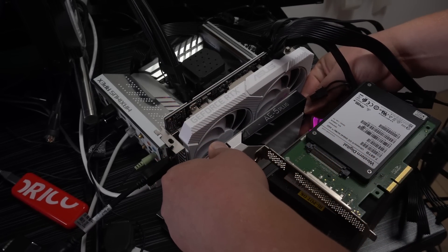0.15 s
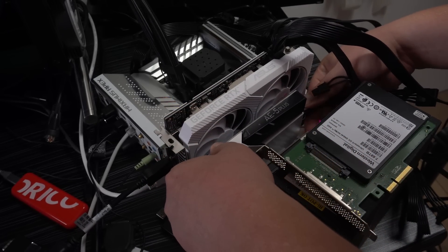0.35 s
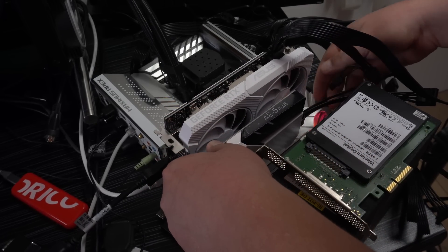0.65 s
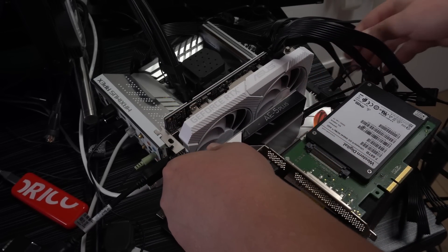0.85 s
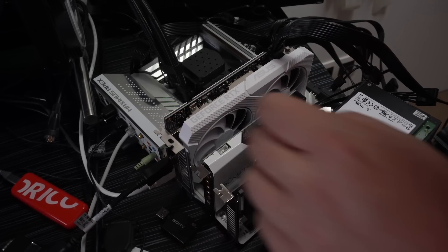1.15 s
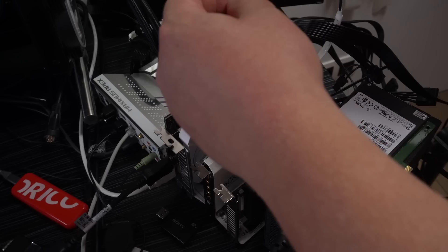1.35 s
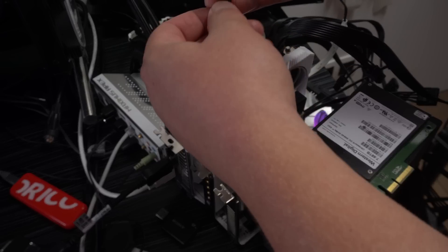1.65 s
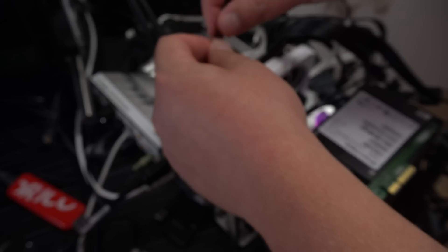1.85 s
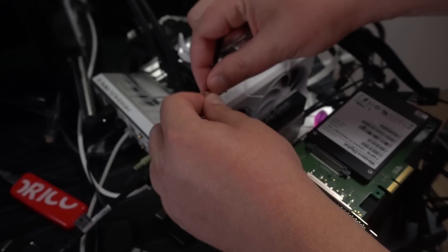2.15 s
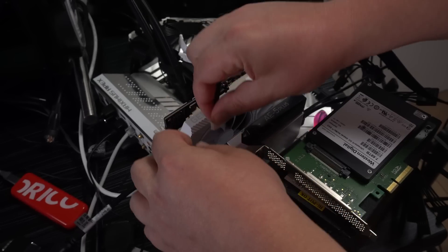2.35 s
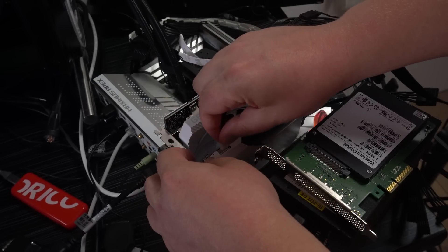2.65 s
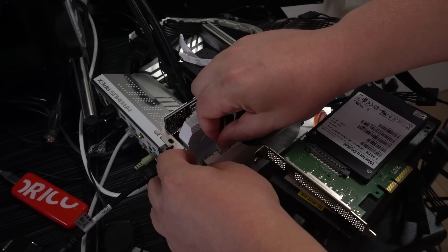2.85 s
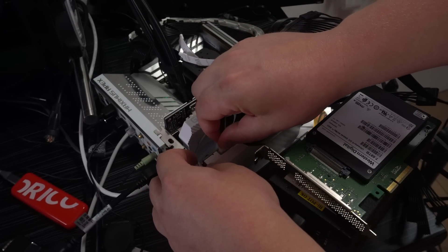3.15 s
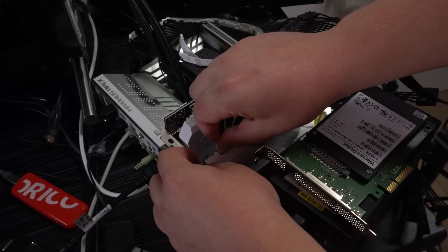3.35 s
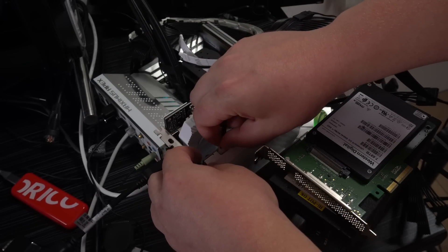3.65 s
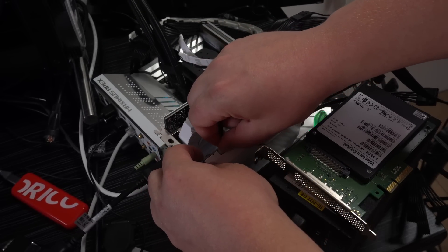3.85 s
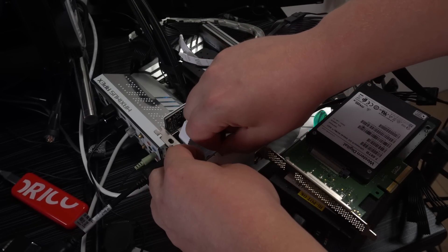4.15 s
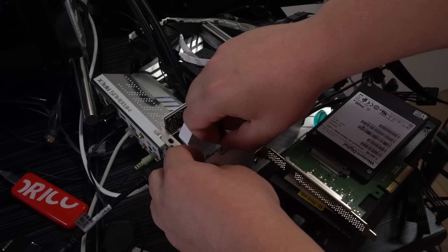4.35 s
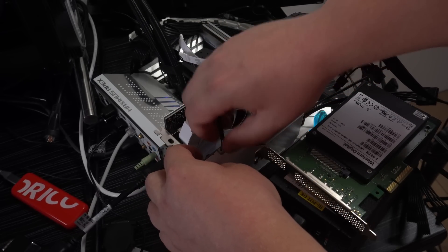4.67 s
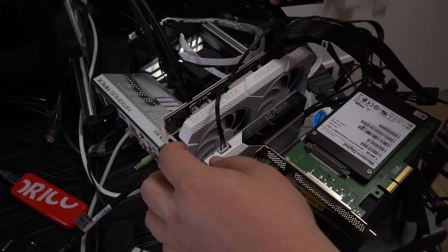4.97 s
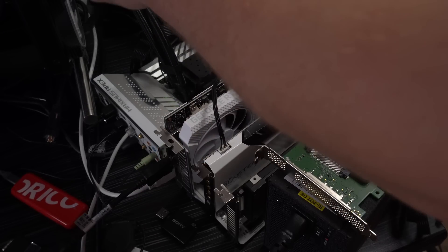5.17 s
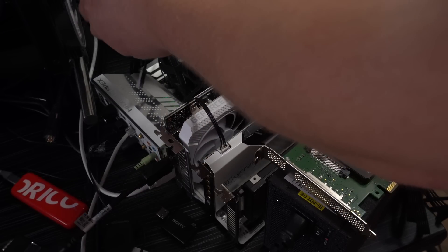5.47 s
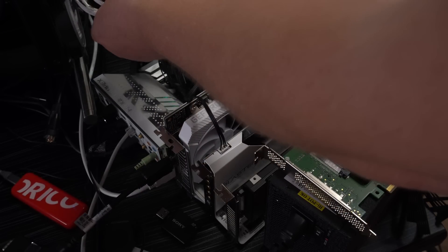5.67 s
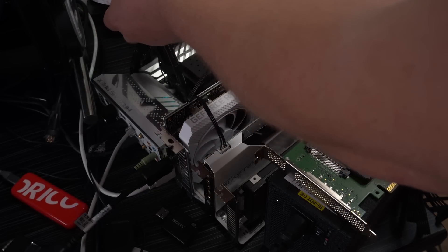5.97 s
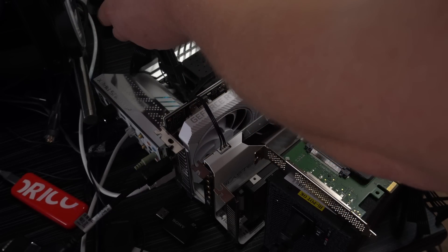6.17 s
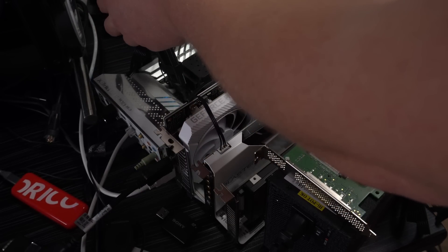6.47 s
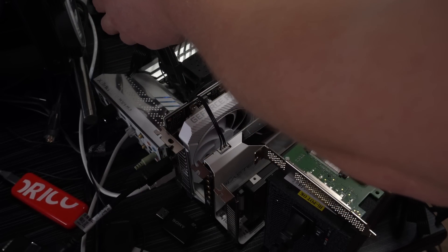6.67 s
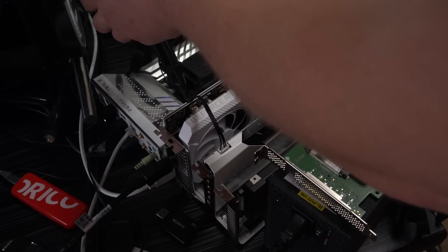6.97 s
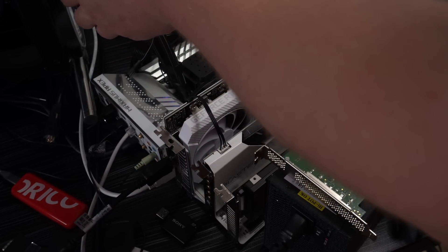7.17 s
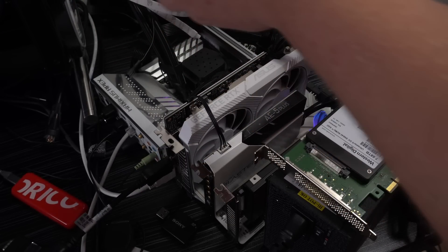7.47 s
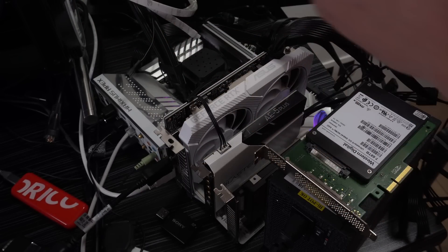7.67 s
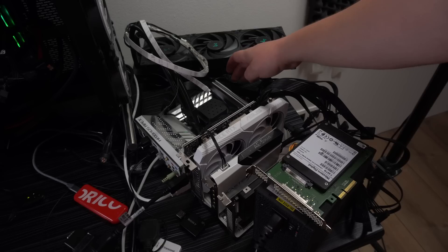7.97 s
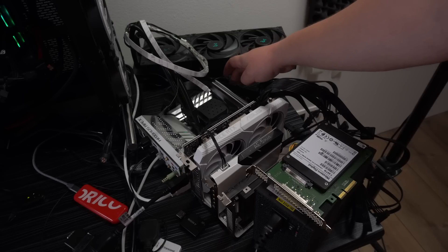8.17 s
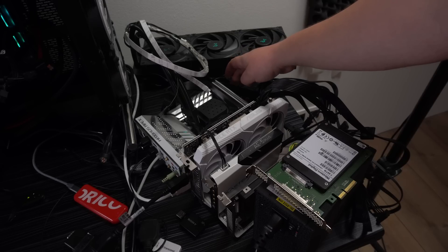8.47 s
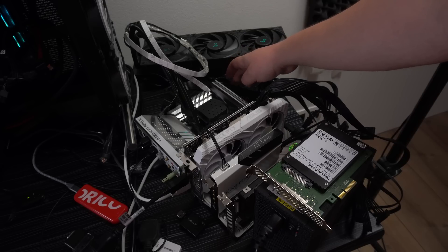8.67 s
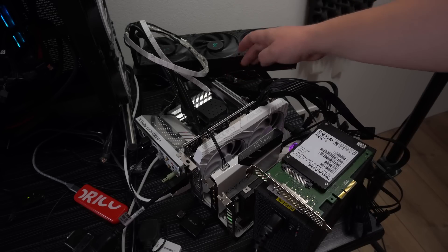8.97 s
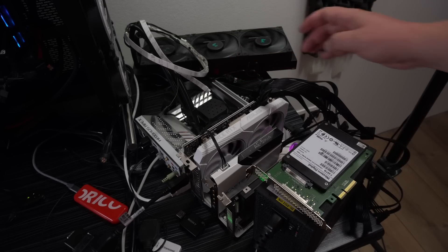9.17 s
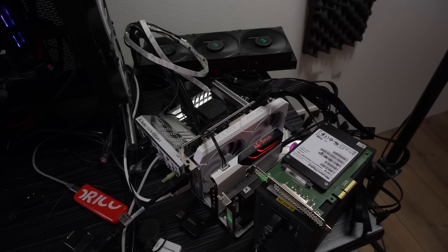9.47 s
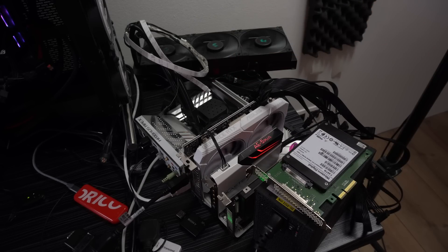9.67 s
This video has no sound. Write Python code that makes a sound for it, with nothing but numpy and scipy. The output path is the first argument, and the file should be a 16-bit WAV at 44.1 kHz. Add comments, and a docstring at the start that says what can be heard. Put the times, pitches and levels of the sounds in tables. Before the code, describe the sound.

Close stereo microphones in a small room catch sparse card clicks and low bench knocks over quiet fan air. A firmer clack lands at four seconds, then a plug scrapes, squeaks, clatters and rattles before a bright metallic latch snap. After a quiet pause, cloth swishes, a switch clicks over and a soft fan drone continues.

```python
"""Hands work on an open computer test bench in a small room, heard by two close-set capsules: a card is
rocked and pressed into its slot, a cable plug scrapes, rattles and latches, and a switch clicks at the back.
Contacts are coloured noise bursts with ringing metal; rubbing is uneven noise. Every push knocks the board,
then booms and shudders through the bench as decaying modes and rumble. Fans run quietly as shaped noise
with faint narrow whines, and a shirt's cloth swishes as the arm draws back."""
import sys
import numpy as np
from scipy import signal
from scipy.fft import rfft, irfft, next_fast_len
from scipy.io import wavfile
from scipy.ndimage import map_coordinates

SR = 44100
rng = np.random.default_rng(int(sys.argv[2]) if len(sys.argv) > 2 else 0)


def master_out(mix):
    """Clip the mix to full scale and print it as 16-bit PCM to the path in sys.argv[1]."""
    frames = np.transpose(np.atleast_2d(mix))
    ceiling = np.clip(frames, -1, 1)
    pcm = np.round(ceiling * 32767).astype(np.int16)
    wavfile.write(sys.argv[1], SR, pcm)


N = 433044  # length in samples

# Levels in the tables are before the room tail and before any gain_db of the source.
# Fan and room air, its colour: (f/Hz, density/dB per Hz)
AIR_COLOUR = [(12, -28), (20, 1), (60, -7.5), (86, -2.5), (222, -8.5), (248, -7), (328, -8.5), (357, -7.5),
              (558, -14), (642, -14), (1030, -19.5), (1290, -22), (2750, -26.5), (10200, -30),
              (16000, -32.5)]
# Likeness of the air at the left and right capsules: (f/Hz, correlation)
AIR_LIKENESS = [(50, 0.87), (150, 1), (400, 0.11), (1000, 0.04), (3000, 0.0823), (15000, 0.17)]
# Deep rumble of the stand: (t/s, level/dB)
RUMBLE_LEVEL = [(0, -60), (.8, -64.5), (1.6, -60.5), (2.6, -69), (3.9, -62.5), (5.2, -62.5), (6.0, -68.5),
                (8.4, -66.5), (9.8, -64)]
AIR_GAIN_DB = -61.5  # steady fan air between the deep rumble and the hiss
# Rumble left by the hardest push, its decay, and its change in dB per dB of boom
SHUDDER_DB, SHUDDER_T60_S, SHUDDER_GROWS = -50, 1.1, 0.45
# The same for the shaking stand, which moves far less after lighter pushes
SHAKE_DB, SHAKE_T60_S, SHAKE_GROWS = -53.5, 1, 3.4
# Spells of electrical whine: (t/s, length/s, level/dB, f/Hz, width/Hz)
WHINE_SPELLS = [(.15, 2.4, -84, 8270, 25), (.3, 0.38, -74, 8430, 25), (1.9, 0.43, -83, 10160, 70),
                (2.55, 4.4, -79.5, 9950, 70), (4.6, 0.75, -75.5, 8290, 25)]
# A fan's steady drone: (t/s, length/s, level/dB)
DRONE_SPELLS = [(7.94, 1.9, -68)]

# The card slides in its slot: (t/s, length/s, level/dB)
CARD_STROKES = [(.184, .088, -56), (4.3, 0.018, -53)]
# Colour of the sliding card: (f/Hz, density/dB per Hz)
CARD_RUB_COLOUR = [(410, -32), (700, -3), (852, -6), (1230, -20), (1500, 0), (1800, -10), (2300, -10),
                   (3110, -9), (3600, -16), (4900, -9), (7590, -20.5), (14200, -14.5), (16000, -35.5)]
# The card's edge and bracket catch: (t/s, level/dB, treble/dB, f/Hz, emphasis at f/dB)
CARD_CONTACTS = [(.2315, -41.5, -11, 1870, 3), (.3188, -48.5, -11, 1910, -3), (.5367, -52, -22, 1320, 3.5),
                 (1.4915, -52, 2.5, 2440, 3), (1.8734, -64, 2.5, 1620, -3), (2.538, -70.5, 5, 2360, 23),
                 (3.0662, -56.5, -7, 1660, -1), (3.3205, -59.5, -1, 10500, 14), (3.3505, -42, -7, 1550, 13),
                 (3.385, -55, -14, 2600, -14), (3.4236, -53, -10, 2110, 0), (4.0118, -31, -5, 1670, -3.5),
                 (4.3995, -48.5, -32, 1030, 10), (4.5043, -57.5, -6, 2720, 2)]
# Colour of the card's contacts: (f/Hz, density/dB per Hz)
CARD_COLOUR = [(530, -23), (900, -5), (1030, -13), (1530, 1), (2140, -8.5), (2660, -5), (3430, -11.5),
               (6890, -25), (7860, -30.5), (12000, -28.5), (16000, -43.5)]
# Ringing of the metal frame: (f/Hz, level/dB, t60/s)
FRAME_MODES = [(1435, -7.5, .2), (1660, -5.5, 0.12), (1890, -3, 0.14), (2290, -8, .25), (4945, -8.5, .28),
               (5167, -4.5, .28)]
# Pushes that reach the bench: (t/s, knock level/dB, boom level/dB, boom f/Hz)
BENCH_PUSHES = [(0.231, -45, -42, 300), (0.325, -38.5, -37.5, 310), (.535, -36.5, -33, 275),
                (0.856, -49, -46, 290), (1.075, -66, -56, 285), (1.491, -45.5, -76, 298),
                (3.075, -46.5, -43.5, 315), (3.168, -45, -38, 310), (3.353, -40, -40.5, 295),
                (3.425, -45.5, -45, 293), (4.013, -29, -28, 320), (4.13, -48, -38.5, 310),
                (4.419, -52.5, -45.5, 280), (4.5, -59, -54, 199), (5.048, -70, -49.5, 340),
                (5.397, -41, -43, 240), (5.537, -50, -46, 286), (5.656, -66, -39, 480),
                (5.725, -77, -32, 456), (6.14, -63, -49, 407), (8.519, -60, -46.5, 150),
                (8.693, -47, -42, 148)]
# Ringing of the bench: (f/Hz, level/dB, t60/s)
BENCH_MODES = [(63.6, -10.5, 0.337), (112.1, -11, 0.53), (145, -16.5, 0.24), (234, -7.5, 0.18),
               (294.5, 3, 0.19), (319.5, -10, 0.2), (383.3, -3.5, 0.16), (431, 0.5, 0.11),
               (521, -6.5, 0.18), (620.4, -13.5, 0.121), (723, -9.5, 0.1), (776, -14.5, 0.08),
               (847, -5.5, 0.16)]
KNOCK_HZ, BOOM_LAG_S = 803, 0.013  # the board knocks at once, the heavier bench follows
# Hands lean and shift on the bench: (t/s, length/s, level/dB)
HAND_LEANS = [(.95, 0.22, -65.5), (1.8, 0.63, -66.5), (3.52, 0.12, -64.5), (5.1, 0.57, -57),
              (5.9, 0.51, -57)]
# Soft swishes of the shirt's cloth: (t/s, length/s, level/dB)
CLOTH_STROKES = [(1.19, .14, -65.5), (7.77, 0.13, -55.5)]
# Colour of the cloth: (f/Hz, density/dB per Hz)
CLOTH_COLOUR = [(500, -9), (1300, -5), (2800, 0.5), (6000, -3), (11000, -7.5), (16000, -14.5)]

# The plug slides in its socket: (t/s, length/s, level/dB)
PLUG_STROKES = [(5.045, 0.18, -71), (5.27, 0.047, -57), (5.33, 0.044, -41.5), (5.4, .41, -59.5)]
# Colour of the sliding plug: (f/Hz, density/dB per Hz)
PLUG_RUB_COLOUR = [(530, -47.5), (900, -11), (1260, -21.5), (1720, -9.5), (2140, -17), (2690, -8.5),
                   (3430, -16.5), (5480, -13), (6030, -14), (6560, -9.5), (7400, -19), (9880, -20.5),
                   (16000, -29)]
# Resonances lifted by its friction: (f/Hz, width/Hz, lift/dB)
PLUG_RUB_MODES = [(1654, 110, 3.5), (2140, 40, 3.5), (5540, 64, 3.5), (6270, 110, 2)]
# The plug's metal shell whistles: (t/s, length/s, level/dB)
SHELL_WHISTLES = [(5.18, .055, -67), (5.335, .035, -56)]
# Friction sings as the plug nears its seat: (t/s, length/s, level/dB)
PLUG_SQUEAK = [(5.343, .02, -37)]
SQUEAK_HZ, SAG_HZ_PER_S = 1770, 1300  # the pitch falls as the plug slows
# The plug knocks in its socket: (t/s, level/dB, treble/dB, f/Hz, emphasis at f/dB)
PLUG_CONTACTS = [(5.2635, -37, -15.5, 1689, 3), (5.373, -22.5, -9, 1900, -6), (5.3960, -15.5, 4, 5650, 3.5),
                 (5.5447, -27.5, -2.5, 1650, 6), (5.6305, -28, -6.5, 1640, 6.5),
                 (5.6812, -45, 10, 7000, 3.5), (5.7312, -30, -2, 2230, 9), (5.7425, -24.5, 1.5, 5300, 5.5),
                 (5.8085, -25.5, -23, 2200, 13.5), (5.963, -46, 1.5, 1170, 35),
                 (6.0655, -46, 9, 10770, 12.5)]
# Colour of the plug's contacts: (f/Hz, density/dB per Hz)
PLUG_COLOUR = [(530, -26), (900, -11), (1070, -25), (1190, -10), (1700, -10), (1850, -8.5), (2190, -7.5),
               (2500, -7.5), (4360, -10.5), (5100, -6), (7060, -10.5), (9200, -7.5), (11800, -7),
               (12700, -18.5), (16000, -14.5)]
# The plug's pins tick as it is wiggled: (t/s, length/s, level/dB)
PIN_RATTLES = [(5.48, 0.34, -47), (5.92, 0.33, -56.5)]
TICKS_PER_S, TICK_T60_S = 83, .006  # mean rate
# The plug judders in as it is pushed home: (t/s, length/s, level/dB)
PLUG_JUDDERS = [(5.665, 0.021, -44.5), (5.7, 0.134, -51.5)]
# The latch rides up and snaps home: (t/s, level/dB, treble/dB, f/Hz, emphasis at f/dB)
LATCH_CONTACTS = [(6.1464, -30.5, -2.5, 1163, 30.5), (6.2468, -17.5, -3, 1610, 3.5)]
# Colour of the latch: (f/Hz, density/dB per Hz)
LATCH_COLOUR = [(530, -58), (900, -19.5), (1200, -14.5), (1560, -1.5), (1800, -11), (2200, 5), (2550, -12),
                (3050, 2.5), (3500, -3), (5040, -7.5), (6400, -16.5), (7300, -7), (11500, -19),
                (16000, -30)]
# Ringing of the latch spring: (f/Hz, level/dB, t60/s)
SPRING_MODES = [(1643, -7, 0.11), (2140, 4, 0.42), (2210, 1.5, 0.37), (2290, -11, 0.34), (4940, 3, 0.25)]
# The switch goes down, over and back: (t/s, level/dB, treble/dB, f/Hz, emphasis at f/dB)
SWITCH_CONTACTS = [(8.5215, -27, -6.5, 2280, -2.5), (8.6445, -23, -8.5, 4070, 11),
                   (8.693, -35, -24.5, 1200, 22)]
# Colour of the switch: (f/Hz, density/dB per Hz)
SWITCH_COLOUR = [(530, -49), (900, -18), (1020, -27), (1500, -19), (1950, -16), (2550, -17.5), (3000, -21),
                 (3600, -17.5), (4100, -14.5), (5000, -14.5), (6800, -17.5), (12300, -19.5), (16000, -30)]
# Ringing of the switch's housing: (f/Hz, level/dB, t60/s)
HOUSING_MODES = [(1490, -9, .12), (2530, -10, .13), (3900, 5, 0.15), (4200, 0, .14)]

# Decay of the room: (f/Hz, t60/s)
ROOM_T60 = [(100, 1), (400, 0.56), (2000, 0.58), (5000, 0.51), (10000, 0.42), (16000, 0.41)]
# Colour of the room tail: (f/Hz, level/dB)
ROOM_TINT = [(100, -5.5), (400, 2), (2000, 0), (5000, -2), (10000, -4), (16000, -5.5)]
# Side part of the room tail: (f/Hz, level/dB)
ROOM_WIDTH = [(100, -16.5), (300, -16.5), (1000, -4), (3000, -5), (12000, -2)]
TOP_HZ = 16000  # the microphone's band limit


def amp(db):
    """Decibels to gain."""
    return 10 ** (np.asarray(db) / 20)


def unit(x):
    """Scale to rms 1."""
    return x / np.sqrt(np.mean(x ** 2) + 1e-20)


def unit_attack(x, span):
    """Scale to rms 1 over the first span seconds."""
    return x / np.sqrt(np.mean(x[..., :int(span * SR)] ** 2) + 1e-20)


def along(points, hz):
    """Read (Hz, value) points on a log-frequency axis."""
    f, v = np.transpose(points)
    return np.interp(np.log(hz + 1), np.log(f + 1), v)


def bump(hz, centre_hz, octaves):
    """A bell curve on the log-frequency axis."""
    return np.exp(-(np.log2((hz + 1) / centre_hz) / octaves) ** 2)


def body(spectrum, modes):
    """Gain of a broad colour with a few resonances standing out of it."""
    def gain(f):
        lift = sum(db / (1 + ((f - hz) / width) ** 2) for hz, width, db in modes)
        return amp(along(spectrum, f) + lift)
    return gain


def filtered(x, response):
    """Multiply the spectrum of x by a response of frequency."""
    n = x.shape[-1]
    m = next_fast_len(n + SR // 8)
    return irfft(rfft(x, m) * response(np.fft.rfftfreq(m, 1 / SR)), m)[..., :n]


def wobble(rate):
    """A smooth random curve, rate knots a second."""
    knots = rng.standard_normal(int(N * rate / SR) + 4)
    return map_coordinates(knots, [np.arange(N) * rate / SR])


def strokes(rows, attack, release):
    """Gain of strokes: each swells by 20 dB over attack up to t, holds, and fades by 20 dB per release."""
    t = np.arange(N) / SR
    gain = 0
    for s, length, db in rows:
        before = np.maximum(s - t, 0) / attack
        after = np.maximum(t - s - length, 0) / release
        gain = gain + amp(db - 20 * before - 20 * after)
    return gain


def pair(size, side_db):
    """Stereo noise with its side part at side_db against the mid."""
    mid, side = rng.standard_normal((2, size))
    return unit(np.array([mid + amp(side_db) * side, mid - amp(side_db) * side]))


def tone(hz, width_hz):
    """A fuzzy line: narrow-band noise of rms 1."""
    return unit(filtered(pair(N, side_db=-2), lambda f: 1 / (1 + ((f - hz) / width_hz) ** 2)))


def ring(modes, t, scatter_db):
    """Sum decaying sine modes, with strengths scattered afresh by scatter_db."""
    out = 0
    for hz, db, t60 in modes:
        decay = amp(db + scatter_db * rng.normal() - 60 * t / t60)
        out = out + decay * np.sin(2 * np.pi * (hz * t + rng.random()))
    return out


def in_room(x, wet_db):
    """Add a fresh diffuse tail of decaying noise, with a decay time for each frequency."""
    hz, t, z = signal.stft(rng.standard_normal((2, SR // 2)), SR, nperseg=256)
    fade = amp(-60 * t / along(ROOM_T60, hz)[:, None]) * (1 - np.exp(-t / 0.0008))
    tail = signal.istft(z * fade, SR, nperseg=256)[1]
    tail = filtered(tail / np.linalg.norm(tail[0]), lambda f: amp(along(ROOM_TINT, f)))
    # the two capsules are close, so they share the long waves of the room
    mid, side = tail
    side = filtered(side, lambda f: amp(along(ROOM_WIDTH, f)))
    tail = np.array([mid + side, mid - side])
    return x + amp(wet_db) * signal.fftconvolve(x, tail, axes=1)[:, :x.shape[1]]


def add(track, s, sound):
    """Mix a sound into the track at s seconds."""
    start = round(s * SR)
    track[:, start:start + sound.shape[1]] += sound[:, :N - start]


def aftermath(t60, grows):
    """Gain of the vibration the pushes leave, scaled to the hardest; their energies add and die away."""
    t = np.arange(N) / SR
    hardest = max(db for _, _, db, _ in BENCH_PUSHES)
    energy = 0
    for s, _, db, _ in BENCH_PUSHES:
        energy = energy + (t > s) * amp(grows * (db - hardest) - 60 * np.abs(t - s) / t60) ** 2
    return np.sqrt(energy)


def sliding(gain, colour, grain_db, wet_db):
    """Uneven stick and slip rasps: noise in the colour of the rubbing parts, its level wobbling fast."""
    rasp = filtered(pair(N, side_db=-8.0), colour) * amp(grain_db * wobble(450))
    return in_room(gain * unit(rasp), wet_db)


def clicks(table, colour, modes, rise, t60, treble_t60, gain_db, treble_db, ring_db, pan_db, wet_db):
    """Each contact is a brief chatter in its part's colour, and sets nearby parts ringing faintly."""
    out, t = np.zeros((2, N)), np.arange(SR // 2) / SR
    swell = 1 - np.exp(-(t / rise) ** 2)
    pan = amp([[pan_db / 2], [-pan_db / 2]])  # positive leans left

    def envelope(decay):
        return swell * amp(-60 * t / max(decay, .004))

    for s, db, bright_db, pitch_hz, pitch_db in table:
        # the place of contact favours one region of the spectrum
        def contact(f):
            return amp(along(colour, f) + pitch_db * bump(f, pitch_hz, octaves=0.63))
        chatter = filtered(pair(len(t), side_db=-7.5), contact)
        low = filtered(chatter, lambda f: 1 / (1 + (f / 5000) ** 8))
        clack = unit_attack(low * envelope(t60), 0.007)
        # the treble dies first
        snap = unit_attack((chatter - low) * envelope(treble_t60), 0.0064)
        ringing = swell * ring(modes, t, scatter_db=5)
        hit = clack + amp(bright_db + treble_db) * snap + amp(ring_db) * ringing
        add(out, s - .001, in_room(amp(db + gain_db) * hit * pan, wet_db))
    return out


def fans(hiss_db):
    """Shaped noise as rumble, fan air and hiss; the low bands swell as the bench shudders from a push."""
    # the mix of mid and side sets how alike the two capsules hear each frequency
    def spread(f):
        turn = np.arccos(np.clip(along(AIR_LIKENESS, f), -1, 1)) / 2
        return amp(along(AIR_COLOUR, f)) * [np.cos(turn), np.sin(turn)]

    mid, side = filtered(rng.standard_normal((2, N)), spread)
    air = unit(np.array([mid + side, mid - side]))
    low = filtered(air, lambda f: 1 / (1 + (f / 800) ** 4))
    deep = filtered(air, lambda f: 1 / (1 + (f / 100) ** 6))
    stand = unit(filtered(deep, lambda f: amp(14 * bump(f, 52, octaves=0.59))))
    rumble_db = np.interp(np.arange(N) / SR, *np.transpose(RUMBLE_LEVEL))
    stand_gain = np.hypot(amp(rumble_db), amp(SHAKE_DB) * aftermath(SHAKE_T60_S, SHAKE_GROWS))
    low_gain = np.hypot(amp(AIR_GAIN_DB), amp(SHUDDER_DB) * aftermath(SHUDDER_T60_S, SHUDDER_GROWS))
    return stand_gain * stand + low_gain * (low - deep) + amp(hiss_db) * (air - low)


def whine():
    """Thin electrical whines come and go as narrow noise; a fan drones with a weaker higher partial."""
    whines = 0
    for s, length, db, hz, width_hz in WHINE_SPELLS:
        whines = whines + strokes([(s, length, db)], attack=0.23, release=.2) * tone(hz, width_hz)
    drone = tone(hz=657, width_hz=48) + amp(-16.5) * tone(hz=1223, width_hz=9.7)
    return whines + strokes(DRONE_SPELLS, attack=0.044, release=.2) * drone


def card_rub():
    """The card rasps along its slot in short strokes."""
    gain = strokes(CARD_STROKES, attack=.02, release=.04)
    return sliding(gain, lambda f: amp(along(CARD_RUB_COLOUR, f)), grain_db=0.5, wet_db=-4)


def card():
    """The card's edge and bracket catch, and the metal frame rings faintly."""
    return clicks(CARD_CONTACTS, CARD_COLOUR, FRAME_MODES, rise=0.00328, t60=0.044, treble_t60=0.032,
                  gain_db=-5, treble_db=2.5, ring_db=-35, pan_db=-1.0, wet_db=-1.0)


def thud(centre_hz, puff_db, focus_db, peak_db, t60):
    """A dull burst that ends steeply above 1 kHz, and the bench's modes near the contact's own pitch."""
    t = np.arange(SR // 2) / SR
    modes = [(hz, level + focus_db * bump(hz, centre_hz, octaves=0.45), decay)
             for hz, level, decay in BENCH_MODES]
    boom = unit_attack(ring(modes, t, scatter_db=0.0) * (1 - np.exp(-t / 0.009)), 0.04)

    def dullness(f):
        peak = amp(peak_db * bump(f, centre_hz, octaves=0.21))
        return peak / (1 + (f / (1.4 * centre_hz)) ** 3) / (1 + (f / 980) ** 12)

    dull = filtered(pair(len(t), side_db=-21.5), dullness)
    puff = unit_attack(dull * amp(-60 * t / t60) * (1 - np.exp(-t / 0.00059)), 0.0093)
    return boom + amp(puff_db) * puff


def bench(gain_db, wet_db):
    """Each push knocks the board and, a moment later, booms in the bench."""
    out = np.zeros((2, N))
    for s, knock_db, boom_db, boom_hz in BENCH_PUSHES:
        knock = thud(KNOCK_HZ, puff_db=2.5, focus_db=6.5, peak_db=13.5, t60=0.19)
        boom = thud(boom_hz, puff_db=2, focus_db=17, peak_db=16, t60=0.28)
        add(out, s, in_room(amp(knock_db + gain_db) * knock, wet_db))
        add(out, s + BOOM_LAG_S, in_room(amp(boom_db + gain_db) * boom, wet_db))
    return out


def hands():
    """Hands lean and shift: soft low noise centred near 305 Hz."""
    def colour(f):
        return amp(12 * bump(f, 305, octaves=0.45)) / (1 + (f / 700) ** 4)
    gain = strokes(HAND_LEANS, attack=0.146, release=0.074)
    return sliding(gain, colour, grain_db=0.5, wet_db=-11.5)


def cloth_swish():
    """A shirt's cloth brushes as the arm draws back: soft noise, swelling slowly, with a quick fade."""
    brush = pair(N, side_db=0) * amp(0.95 * wobble(54))
    cloth = unit(filtered(brush, lambda f: amp(along(CLOTH_COLOUR, f))))
    lean_right = amp([[-1.5], [1.5]])
    return strokes(CLOTH_STROKES, attack=.22, release=.015) * cloth * lean_right


def plug_rub():
    """The plug scrapes in its socket, friction lifting a few resonances."""
    gain = strokes(PLUG_STROKES, attack=0.0045, release=.03)
    return sliding(gain, body(PLUG_RUB_COLOUR, PLUG_RUB_MODES), grain_db=-2.4, wet_db=0)


def squeak(jitter, rough_db, wet_db):
    """Thin two-line whistles of the metal shell, and a short, rough, falling squeal of friction."""
    since = np.clip(np.arange(N) / SR - PLUG_SQUEAK[0][0], -.05, .05)
    hz = (SQUEAK_HZ - SAG_HZ_PER_S * since) * (1 + jitter * wobble(400))
    squeal = unit(amp(rough_db * wobble(260)) * np.sin(2 * np.pi * np.cumsum(hz) / SR))
    whistle = unit(tone(hz=4840, width_hz=29) + tone(hz=6370, width_hz=55))
    squeals = strokes(PLUG_SQUEAK, attack=.012, release=0.021) * squeal
    whistles = strokes(SHELL_WHISTLES, attack=0.0087, release=.02) * whistle
    return in_room(squeals + whistles, wet_db)


def plug():
    """The plug knocks in its socket, and the metal frame rings faintly."""
    return clicks(PLUG_CONTACTS, PLUG_COLOUR, FRAME_MODES, rise=0.0045, t60=0.026, treble_t60=.012,
                  gain_db=-10.0, treble_db=4.0, ring_db=-24, pan_db=1.2, wet_db=-5.5)


def rattle(spread_db, gain_db, wet_db):
    """Pins give tiny decaying ticks of uneven size at random moments while the plug is wiggled."""
    hits = (rng.random(N) < TICKS_PER_S / SR) * amp(spread_db * rng.standard_normal(N))
    envelope = signal.lfilter([1], [1, -amp(-60 / (TICK_T60_S * SR))], hits)
    ticks = unit(filtered(pair(N, side_db=-1.5) * envelope, lambda f: amp(along(PLUG_COLOUR, f))))
    return in_room(amp(gain_db) * strokes(PIN_RATTLES, attack=.02, release=.02) * ticks, wet_db)


def judder():
    """The plug judders home: uneven noise around 436 Hz."""
    gain = strokes(PLUG_JUDDERS, attack=0.0071, release=0.013)
    return sliding(gain, lambda f: bump(f, 436, octaves=0.48), grain_db=0.5, wet_db=-9.5)


def latch():
    """The latch rides up and snaps home, and its spring rings."""
    return clicks(LATCH_CONTACTS, LATCH_COLOUR, SPRING_MODES, rise=0.0005, t60=0.032, treble_t60=0.027,
                  gain_db=-9.0, treble_db=1.5, ring_db=-22, pan_db=0.8, wet_db=-5)


def switch():
    """The switch at the back clicks over, and its housing rings."""
    return clicks(SWITCH_CONTACTS, SWITCH_COLOUR, HOUSING_MODES, rise=0.0018, t60=0.0295, treble_t60=.022,
                  gain_db=-11.5, treble_db=3.5, ring_db=-24, pan_db=0.5, wet_db=-3.5)


def scene():
    """All the handling over the running machine."""
    machine = fans(hiss_db=-59.0) + whine()
    card_work = card_rub() + card()
    on_bench = bench(gain_db=-12.5, wet_db=-6.5) + hands() + cloth_swish()
    plug_friction = plug_rub() + squeak(jitter=0.0349, rough_db=3.5, wet_db=-3) + judder()
    plug_contacts = plug() + rattle(spread_db=4, gain_db=-5, wet_db=3) + latch()
    return machine + card_work + on_bench + plug_friction + plug_contacts + switch()


def record(dry):
    """The microphone keeps nothing above its band limit."""
    return filtered(dry, lambda f: f < TOP_HZ)


dry = scene()
out = record(dry)
master_out(out)
```